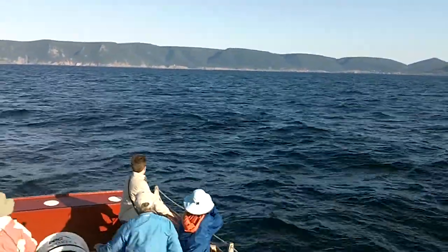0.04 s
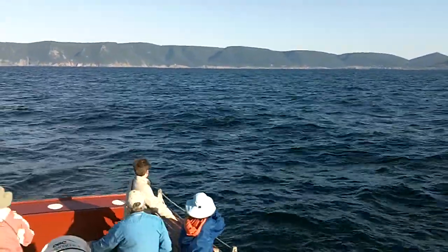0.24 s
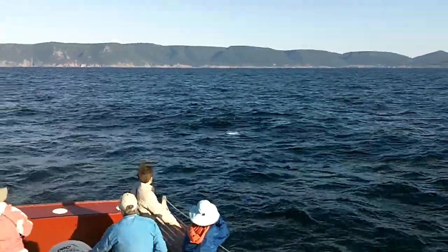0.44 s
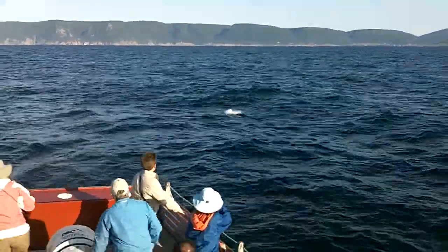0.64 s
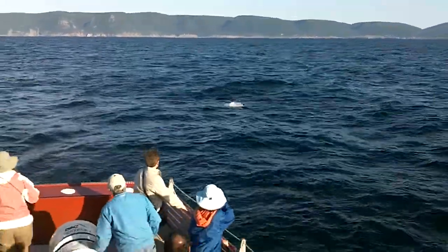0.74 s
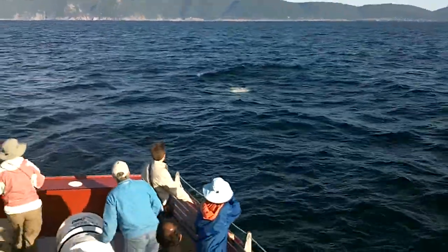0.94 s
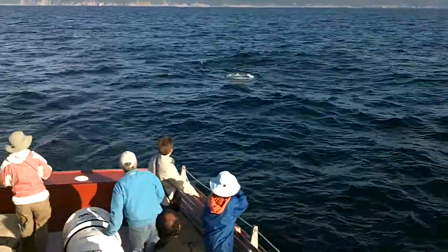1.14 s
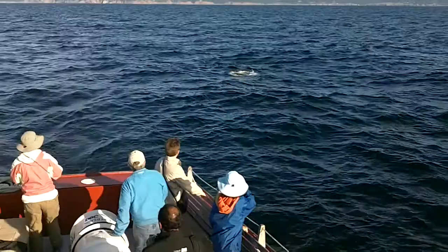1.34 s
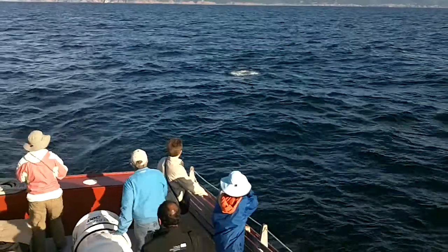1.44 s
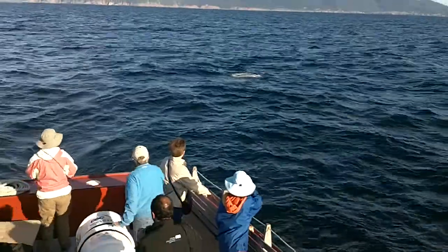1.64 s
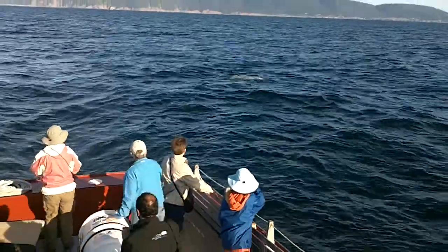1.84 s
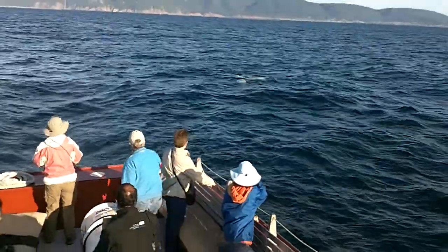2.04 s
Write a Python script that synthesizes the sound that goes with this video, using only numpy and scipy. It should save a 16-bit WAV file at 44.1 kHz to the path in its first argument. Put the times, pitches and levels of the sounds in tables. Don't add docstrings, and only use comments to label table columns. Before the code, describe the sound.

Gusty wind rumbles and thumps on a bare microphone on an open boat; cloth rustles and snaps close by, rubber squeaks in the second half, and wake hisses faintly before a final hard burst.

```python
import sys
import numpy as np
from scipy import signal
from scipy.fft import rfft, irfft, next_fast_len
from scipy.io import wavfile
from scipy.ndimage import uniform_filter1d, map_coordinates

SR = 44100
rng = np.random.default_rng(int(sys.argv[2]) if len(sys.argv) > 2 else 0)


def generate_wav(signal):
    frames = np.transpose(np.atleast_2d(signal))
    scaled = np.clip(frames, -1, 1) * 32767
    pcm = np.round(scaled).astype(np.int16)
    wavfile.write(sys.argv[1], SR, pcm)


def invert_db(x):
    u = np.asarray(x, float) / 20
    return 10 ** u


N = 91904
T = np.arange(N) / SR

# time in seconds, strength in dB, roughness (upper rumble) in dB.
WIND = [(0.0, -21.5, -3.5), (0.09, -34, 4.5), (0.37, -27, -5.5), (0.41, -36, 7), (0.45, -19, -5),
        (0.69, -10.5, 0.5), (0.71, -12, -7), (0.85, -18, -1), (1.15, -22.5, 7), (1.19, -23.5, -9.5),
        (1.28, -18.5, 11), (1.32, -23, -3.5), (1.39, -30, 11), (1.42, -30.5, 5.5), (1.78, -18, -4.5),
        (1.81, -8, -3), (2.04, -23.5, -3)]
# centre in seconds, width in seconds, change in dB.
LULLS = [
    (.09, 0.01, -6.5),
    (.39, 0.014, 1.5),
    (.925, 0.013, -5.5),
    (.995, 0.022, -7.5),
    (1.52, 0.0073, -4),
    (1.965, 0.02, -13.5),
]
# frequency in Hz, density in dB per Hz.
RUMBLE_COLOUR = [(7.1, -35), (12, -24), (22, 1.5), (35, -7), (94, -10.5), (449, -36), (727, -45.5),
                 (1050, -59.5), (1200, -60.5), (1560, -68), (2640, -120)]
# centre in seconds, peak pressure (full scale 1), width in seconds.
SURGES = [(0.459, -0.26, .005), (0.467, 0.11, 0.0078), (0.501, 0.25, 0.0062), (0.529, -0.3, 0.0074),
          (0.592, 0.4, .012), (0.611, -0.34, 0.0086), (0.638, -0.52, 0.0035), (.665, -0.43, 0.0054),
          (0.682, 0.59, 0.0066), (0.701, -0.42, 0.026), (.729, 0.12, 0.006), (0.764, -0.28, 0.0032),
          (0.7677, 0.12, 0.0028), (0.78, 0.46, 0.0038), (0.808, -0.45, 0.011), (.852, -0.34, 0.0024),
          (0.874, 0.53, 0.0072), (0.898, -0.35, 0.0093), (0.96, 0.51, 0.0047), (0.9516, -0.25, 0.0016),
          (0.969, -0.38, 0.011), (1.0225, 0.18, 0.0035), (1.0393, -0.29, .004), (1.0444, -0.036, 0.002),
          (1.076, 0.44, 0.0043), (1.085, 0.12, 0.0036), (1.099, -0.37, 0.0059), (1.1069, -0.37, 0.0014),
          (1.131, -0.28, 0.0014), (1.142, 0.28, 0.0046), (1.2209, -0.18, 0.0017), (1.2303, 0.25, 0.0068),
          (1.2513, -0.054, 0.0011), (1.256, 0.17, 0.0027), (1.262, -0.64, 0.0039), (1.271, -0.36, 0.0035),
          (1.2807, 0.24, 0.0025), (1.287, 0.58, 0.0033), (1.372, .15, 0.0036), (1.3798, -0.16, 0.0044),
          (1.3916, 0.19, 0.0013), (1.6286, 0.24, 0.0047), (1.651, -0.068, 0.0022), (1.756, 0.29, 0.0086),
          (1.7784, -0.16, 0.004), (1.8, 0.48, 0.0021), (1.805, -0.33, 0.0015), (1.81, 1.3, 0.00037),
          (1.8123, 0.24, 0.00023), (1.817, 0.25, 0.00024), (1.8189, 0.22, 0.0016), (1.821, 0.25, 0.0009),
          (1.8263, -0.17, 0.0012), (1.8403, 0.33, 0.0022), (1.8539, -.28, 0.003), (1.859, -0.21, 0.0016),
          (1.8746, -.15, 0.0026), (1.9019, -0.39, 0.0027), (1.918, 0.43, 0.013), (2.0744, -0.19, 0.0064),
          (2.085, 0.11, .004)]
# start in seconds, peak in dB, 60 dB decay in seconds.
PUFFS = [(.551, -28, 0.13), (.59, -25.5, 0.069), (.85, -28.5, 0.079), (.875, -20.5, 0.044),
         (.94, -33, 0.041), (1.038, -42, 0.025), (1.1, -27, 0.028), (1.127, -23, 0.045),
         (1.252, -13, 0.018), (1.709, -26, 0.04), (1.8095, 1, 0.0085), (1.8165, -5, 0.013),
         (1.8275, -12.5, 0.033), (1.832, -13, .02), (1.847, -22, 0.017), (1.859, -24, 0.039),
         (1.865, -27.5, 0.016), (1.891, -30, 0.047)]
# start in seconds, peak in dB, 60 dB decay in seconds.
SOFT_PUFFS = [
    (.491, -28.5, 0.081),
    (.62, -22, 0.03),
]
# frequency in Hz, density in dB per Hz.
PUFF_COLOUR = [(100, -39.5), (250, 8), (450, -2), (800, -6), (1300, -19), (2500, -31.5), (4000, -89)]

# time in seconds, slip rate in Hz, level in dB, level of the overtones in dB.
FIRST_SQUEAK = [
    (1.33, 1940, -63, -48),
    (1.35, 1837, -48.5, -40.5),
    (1.36, 1769, -61, -49),
    (1.38, 1350, -37, -40),
    (1.4, 948, -49, -44),
    (1.415, 1257, -34.5, -38),
    (1.428, 1460, -49, -48),
]
SECOND_SQUEAK = [
    (1.44, 1810, -38, -44),
    (1.458, 1784, -53, -53),
    (1.471, 2050, -44, -67),
    (1.483, 1878, -41.5, -36),
    (1.494, 1768, -40.5, -35.5),
    (1.508, 1930, -43, -43),
    (1.525, 2070, -39.5, -59),
    (1.539, 1688, -63, -40),
    (1.552, 2080, -60, -53.5),
]
THIRD_SQUEAK = [
    (1.612, 2670, -37, -41),
    (1.626, 2513, -37, -48.5),
    (1.635, 2041, -32, -43),
    (1.649, 1872, -49, -49.5),
    (1.673, 1518, -49.5, -47),
    (1.697, 1060, -53.5, -43.5),
    (1.72, 670, -48, -77),
]
# time in seconds, slip rate in Hz, level in dB, level of the overtones in dB.
CHIRPS = [
    [(1.315, 2320, -56, -70), (1.33, 2200, -44.5, -80)],
    [(1.428, 2305, -35.5, -48), (1.442, 2380, -51, -50)],
    [(1.572, 2290, -67, -36), (1.583, 2200, -65, -42.5), (1.6, 1794, -50, -54)],
    [(1.55, 3210, -44, -75), (1.562, 2700, -32, -75)],
    [(1.43, 4510, -54, -80), (1.442, 4860, -50, -80)],
]
# frequency in Hz, gain in dB.
OVERTONES = [(1000, 0), (4500, 0), (5500, -14), (7500, -30), (10000, -27), (14000, -29)]
# time in seconds, lift of the highest overtones in dB.
SHINE = [(1.33, -25), (1.4, -8), (1.49, -12), (1.525, 0), (1.545, 10), (1.58, 2), (1.615, 9), (1.655, 10),
         (1.69, -6)]

# start in seconds, peak in dB, 60 dB decay in seconds.
RUSTLES = [(0.221, -38, 0.092), (0.287, -33, 0.19), (0.3124, -37, 0.065), (0.3696, -35.5, 0.091),
           (0.3924, -39.5, 0.063), (0.537, -33.5, 0.12), (0.555, -31.5, 0.094), (0.5871, -37.5, 0.089),
           (0.7602, -40, 0.067), (0.847, -33.5, 0.025), (1.039, -38, 0.072), (1.0649, -30.5, 0.051),
           (1.1478, -42.5, 0.34), (1.1924, -27, 0.098), (1.719, -46, 0.12), (1.999, -34.5, 0.038)]
# start in seconds, peak in dB.
SNAPS = [(0.2916, -24), (0.3688, -38), (0.5355, -34), (0.5431, -23), (0.5523, -16), (0.635, -40),
         (.7915, -42), (0.797, -40), (0.944, -50), (1.124, -45), (1.1458, -30.5), (1.193, -28.5),
         (1.4643, -30), (1.719, -43), (1.7429, -32.5), (1.9551, -33), (1.9995, -23.5)]
# frequency in Hz, density in dB per Hz.
CLOTH_COLOUR = [(350, -35.5), (700, -29), (2100, -2), (3800, 3), (4700, -1.5), (6000, -25.5), (7500, -38),
                (15400, -48.5), (16000, -120)]

# time in seconds, level in dB, tilt towards the treble in dB.
SEA = [(0, -50.5, 2.5), (.14, -52.5, 1.5), (.47, -53, 3.5), (.66, -51.5, 0.5), (.83, -57, 1.5),
       (.89, -51.5, 0), (.915, -63, -2), (.95, -54, 0), (1.05, -44, -3), (1.1, -55, -2),
       (1.22, -40.5, -2.5), (1.27, -41, -4.5), (1.3, -64, 0), (1.37, -45.5, 3.5), (1.58, -44.5, 2),
       (1.78, -51, 0), (1.87, -57, -1.5), (2.08, -51, 2.5)]
# centre in seconds, width in seconds, change in dB.
HISS_GAPS = [
    (.695, 0.0039, -18),
    (.714, 0.0057, -7),
    (0.786, 0.0014, -22),
    (.889, .003, -12),
    (0.904, .005, -9),
]
# frequency in Hz, density in dB per Hz.
HISS_COLOUR = [(240, -55.5), (500, -1.5), (2000, -5), (3900, -4), (4900, -7), (6000, -15), (7500, -35),
               (15400, -32.5), (16000, -120)]

# centre in Hz, width in Hz.
NOTCHES = [(2740, 1304), (5520, 1660), (8100, 840), (11030, 500)]
# level in dB of each harmonic of the step rate, lowest first.
BUZZ_DB = [-37, -40, -56, -53, -53, -53]


def unit(x):
    return x / np.sqrt(np.mean(x ** 2) + 1e-20)


def along(points, hz):
    f, value = np.transpose(points)
    return np.interp(np.log(hz + 1), np.log(f + 1), value)


def curves(rows):
    s, *columns = np.transpose(rows)
    return [np.interp(T, s, column) for column in columns]


def dips(rows):
    s, width, change_db = np.transpose(rows)[:, :, None]
    return np.sum(change_db * np.exp(-((T - s) / width) ** 4), axis=0)


def wobble(rate_hz, span=slice(None)):
    return map_coordinates(rng.standard_normal(N // 8), [T[span] * rate_hz])


def filtered(x, response):
    m = next_fast_len(N + 8192)
    hz = np.fft.rfftfreq(m, 1 / SR)
    return irfft(rfft(x, m) * response(hz), m)[..., :N]


def noise(colour, patchy_db):
    z = signal.stft(rng.standard_normal(N + 512), nperseg=256)[2]
    patches = uniform_filter1d(rng.standard_normal(z.shape), 5, 0)
    patches = unit(uniform_filter1d(patches, 6, 1))
    x = signal.istft(z * invert_db(patchy_db * patches), nperseg=256)[1][:N]
    return unit(filtered(x, lambda hz: invert_db(along(colour, hz))))


def bursts(rows, rise_s):
    s, peak_db, t60 = np.transpose(rows)[:, :, None]
    age = np.clip(T - s, 0, 9)
    fall = invert_db(peak_db - 60 * age / t60)
    return np.sum(fall * (1 - np.exp(-age / rise_s)), axis=0)


def wind():
    strength_db, rough_db = curves(WIND)
    strength_db = strength_db + dips(LULLS)
    push = surges()
    shaking = rumble(strength_db, rough_db, push)
    push = filtered(push, lambda hz: hz ** 2 / (hz ** 2 + 8 ** 2))
    return shaking + push + puffs(strength_db, rough_db) * np.clip(1 - push ** 2, 0, 1)


def surges():
    s, peak, width = np.transpose(SURGES)[:, :, None]
    return np.sum(peak * np.exp(-((T - s) / width) ** 2), axis=0)


def rumble(strength_db, rough_db, push):
    lumps_db, lump_hz, calm, swing = 1.5, 14.54, 6.9, 0.2
    air = noise(RUMBLE_COLOUR, patchy_db=3.0)
    deep = filtered(air, lambda hz: 1 / (1 + (hz / 130) ** 4))
    level_db = strength_db - 1.5 + lumps_db * wobble(lump_hz)
    x = invert_db(level_db) * (deep + invert_db(rough_db) * (air - deep))
    x = x / (1 + calm * uniform_filter1d(abs(push), size=300))
    return swing * np.tanh(x / swing)


def puffs(strength_db, rough_db):
    eddy_hz, eddy_db, eddy_spread_db, soft_hz = 65.2, -32, 8, 743
    flutter_db = 1.73 * strength_db + rough_db + eddy_db + eddy_spread_db * wobble(eddy_hz)
    gush = noise(PUFF_COLOUR, patchy_db=-2.5)
    dull = filtered(gush, lambda hz: hz / 500 / (1 + (hz / soft_hz) ** 8))
    sharp_level = invert_db(flutter_db) + invert_db(-3) * bursts(PUFFS, rise_s=0.00062)
    return sharp_level * gush + bursts(SOFT_PUFFS, rise_s=0.0026) * dull


def squeak(rows):
    jitter, flutter_db, top_hz = 0.011, 3, 15400
    start, end = rows[0][0], rows[-1][0]
    span = slice(int((start - 0.002) * SR), int((end + 0.002) * SR))
    hz, first_db, upper_db = [c[span] for c in curves(rows)]
    to_edge = np.minimum(T[span] - start, end - T[span])
    gate = np.clip(to_edge / 0.0015 + 1, 0, 1)
    phase = 2 * np.pi * np.cumsum(hz * (1 + jitter * wobble(400, span))) / SR
    k = np.arange(1, 13)[:, None]
    overtone_db = upper_db - 6 * np.minimum(k - 2, 1) + along(OVERTONES, k * hz)
    level_db = np.where(k < 2, first_db, overtone_db)
    level_db += curves(SHINE)[0][span] * np.clip((k * hz - 6000) / 2500, 0, 1)
    flutter = np.array([wobble(130, span) for _ in k])
    gains = invert_db(level_db + 3.5 + flutter_db * flutter) * (k * hz < top_hz)
    out = np.zeros(N)
    out[span] = gate * np.sum(gains * np.sin(k * phase), axis=0)
    return out


def rubber():
    strokes = [FIRST_SQUEAK, SECOND_SQUEAK, THIRD_SQUEAK]
    return sum(squeak(rows) for rows in strokes + CHIRPS)


def cloth():
    crackle = invert_db(-1.5 + 3.4 * wobble(600))
    rustle = crackle * bursts(RUSTLES, rise_s=0.0017) * noise(CLOTH_COLOUR, patchy_db=4.0)
    snap_t60_s = 0.013
    snaps = bursts([(s, db, snap_t60_s) for s, db in SNAPS], rise_s=0.00027)
    return rustle + snaps * noise(CLOTH_COLOUR, patchy_db=0.7)


def sea():
    level_db, tilt_db = curves(SEA)
    hiss = noise(HISS_COLOUR, patchy_db=2)
    low = filtered(hiss, lambda hz: 1 / (1 + (hz / 2600) ** 4))
    tilted = low * invert_db(-tilt_db) + (hiss - low) * invert_db(tilt_db)
    fizz_db = 0.31 * wobble(30.04) + 2.77 * wobble(400)
    return invert_db(level_db + dips(HISS_GAPS) + 2.5 + fizz_db) * tilted


def scene():
    return (wind() + rubber() + cloth() + sea())[None]


def notched(f):
    return np.prod([(c * c - f * f) / (c * c - f * f + 1j * f * w) for c, w in NOTCHES], axis=0)


def gain_control(x):
    limit, duck_db_per_s, release_s, step_hz = 0.285, 706, 0.015, 2400
    level = uniform_filter1d(abs(x[0]), size=40)
    over = np.clip((level - limit) / 0.03, 0, 1)
    duck_db = signal.lfilter([duck_db_per_s / SR], [1, -np.exp(-1 / (release_s * SR))], over)
    buzz = sum(invert_db(db) * np.sin(2 * np.pi * k * step_hz * T) for k, db in enumerate(BUZZ_DB, 1))
    return x * invert_db(-duck_db) * (1 + over * buzz)


def roll_off(x):
    return signal.sosfilt(signal.butter(12, 15480, fs=SR, output="sos"), x)


def record(dry):
    mix = gain_control(filtered(dry, notched))
    return roll_off(np.clip(mix, -1, 1))


dry = scene()
out = record(dry)
generate_wav(out)
```